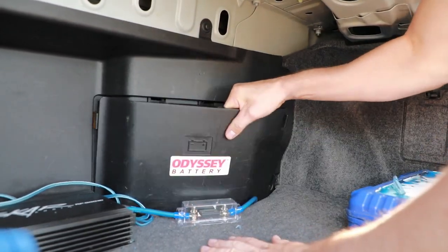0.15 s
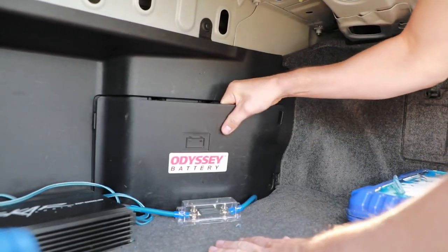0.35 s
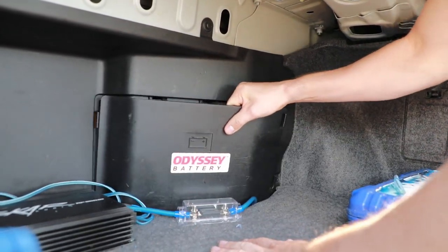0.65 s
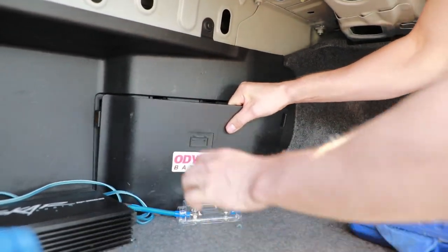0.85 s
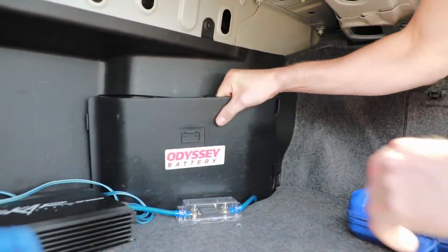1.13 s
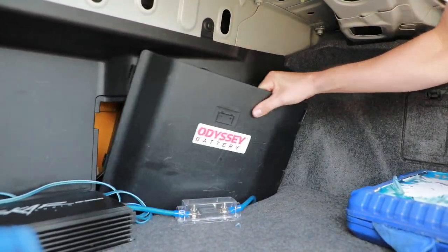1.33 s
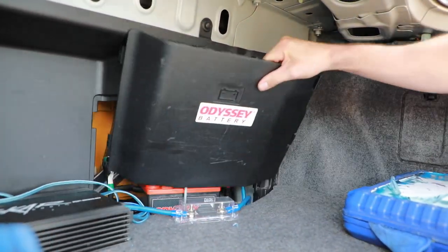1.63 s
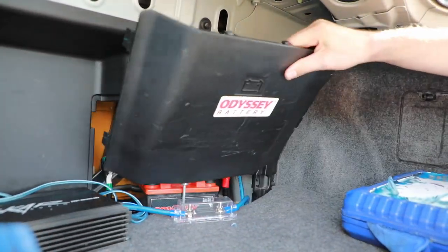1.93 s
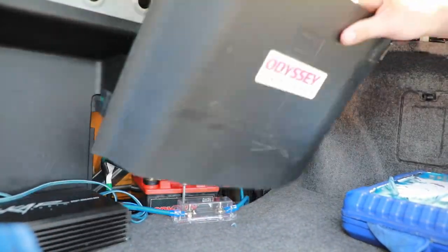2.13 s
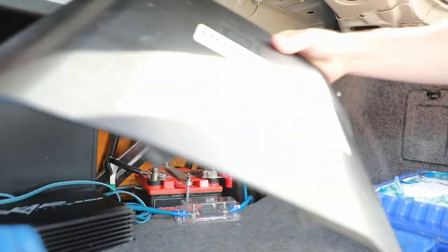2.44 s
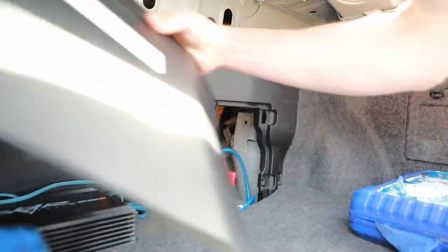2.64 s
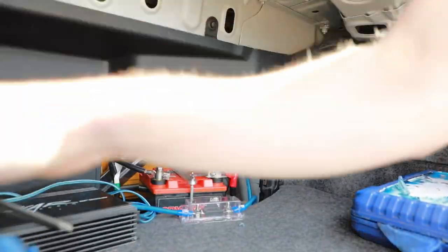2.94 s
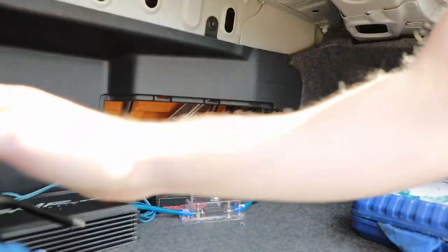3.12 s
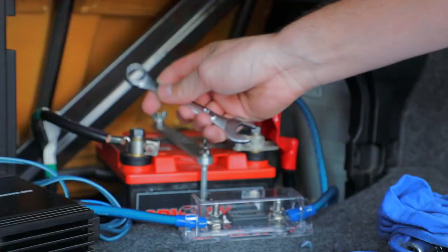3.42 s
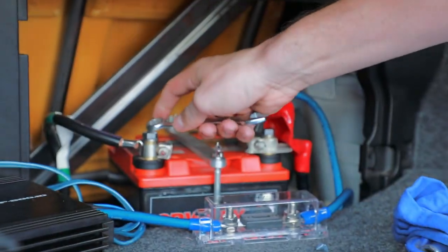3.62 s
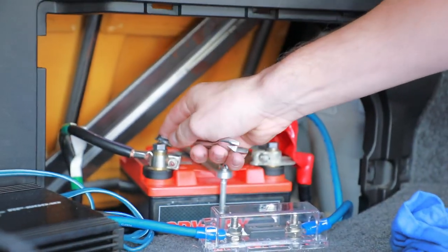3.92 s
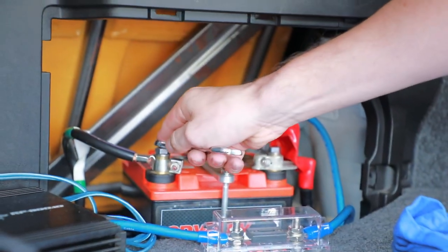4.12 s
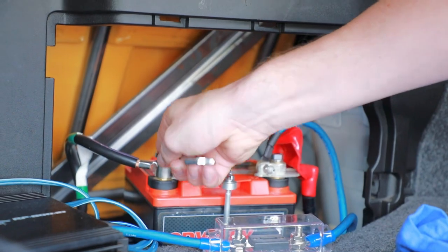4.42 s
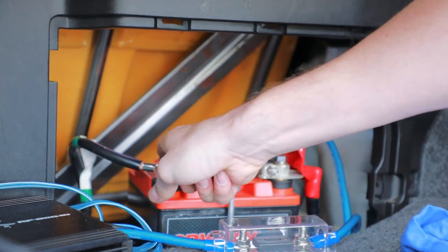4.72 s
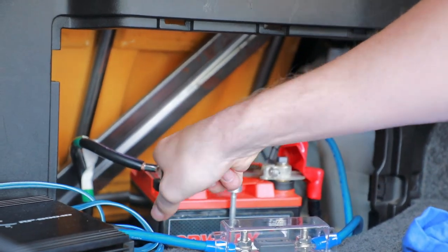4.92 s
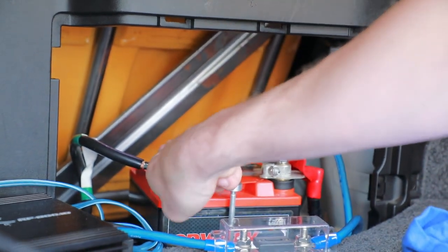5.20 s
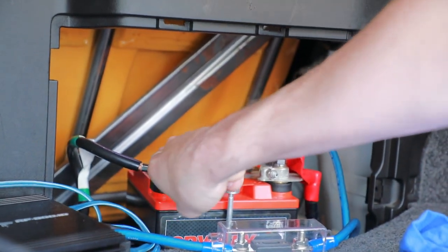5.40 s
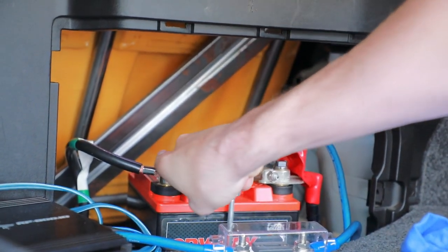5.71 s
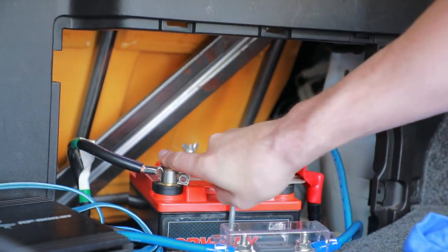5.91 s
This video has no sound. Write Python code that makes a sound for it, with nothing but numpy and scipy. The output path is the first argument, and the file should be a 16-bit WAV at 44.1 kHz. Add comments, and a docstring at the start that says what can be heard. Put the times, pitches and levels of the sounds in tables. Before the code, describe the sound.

A plastic cover creaks, snaps free and knocks in a car trunk, then a steel spanner clinks lightly on a battery terminal.

```python
"""Outdoor air drifts into a carpeted car trunk, where a plastic battery cover creaks under strain
and its tabs snap free. A thin high hiss comes and goes as the loose cover knocks and is slid aside.
A steel spanner is picked up and clinks onto the battery terminal, and fingers fiddle with the nut.
Towards the end a faint engine hum swells and eases."""
import sys
import numpy as np
from scipy import signal
from scipy.fft import rfft, irfft, next_fast_len
from scipy.io import wavfile
from scipy.ndimage import map_coordinates

SR = 44100
rng = np.random.default_rng(int(sys.argv[2]) if len(sys.argv) > 2 else 0)


def wav_out(sig):
    """Save sig, one row per channel (or a flat mono array), as 16-bit PCM at SR to the path in sys.argv[1]."""
    wavfile.write(sys.argv[1], SR, np.round(np.clip(np.atleast_2d(sig).T, -1, 1) * 32767).astype(np.int16))


N = 267025
TIME = np.arange(N) / SR
RING = np.arange(SR // 2) / SR  # time since a blow [s]


def amp(db):
    """Decibels to amplitude ratio."""
    return 10 ** (np.asarray(db) / 20)

def unit(x):
    """Normalise to rms 1."""
    return x / np.sqrt(np.mean(x ** 2) + 1e-20)

def unit_blow(x):
    """Normalise a blow to the energy of 10 ms at rms 1."""
    return x / np.sqrt(np.sum(x ** 2) / (SR / 100) + 1e-20)

def along(points, hz):
    """Interpolate (frequency [Hz], value) points on a log axis."""
    freqs, values = np.transpose(points)
    return np.interp(np.log(hz + 1), np.log(freqs), values)

def wobble(rate):
    """Smooth random modulation, rate knots a second."""
    return map_coordinates(rng.standard_normal(int(N * rate / SR) + 4), [TIME * rate])

def held(start, end, rise_db_per_s, fall_db_per_s):
    """Exponential attack and release, with gain 1 from start to end."""
    return amp(-rise_db_per_s * np.maximum(start - TIME, 0) - fall_db_per_s * np.maximum(TIME - end, 0))

def swells(strokes):
    """Skewed Gaussian envelopes: each stroke dies more slowly than it rises."""
    return sum(amp(db) * np.exp(-.5 * ((TIME - s) / (rise * np.where(TIME < s, 1, 1.73))) ** 2)
               for s, rise, db in strokes)

def chance_moments(start, end, count):
    """One random time in each of count equal intervals."""
    return start + (end - start) * (np.arange(count) + rng.random(count)) / count

def add(track, s, sound):
    """Superpose a sound on the track at time s."""
    part = track[max(round(s * SR), 0):][:len(sound)]
    part += sound[:len(part)]

def colour(x, spectrum):
    """Minimum-phase filter from (frequency [Hz], level [dB]) points."""
    size = 2 * next_fast_len(len(x) // 2 + 4096)
    gain = amp(along(spectrum, np.fft.rfftfreq(size, 1 / SR)))
    cepstrum = irfft(np.log(np.maximum(gain, 1e-6)))
    cepstrum[1:size // 2] *= 2
    cepstrum[size // 2 + 1:] = 0
    return irfft(rfft(x, size) * np.exp(rfft(cepstrum)))[:len(x)]

def band(x, edges, kind, order=3):
    """Causal low-, high- or band-pass."""
    return signal.sosfilt(signal.butter(order, edges, kind, fs=SR, output="sos"), x)

def ring(modes, scatter_db, damping):
    """Free vibration: a sum of damped modes, struck at new strengths each time."""
    hz, db, t60 = np.transpose(modes)[:, :, None]
    gain = amp(db + scatter_db * rng.standard_normal(hz.shape) - 60 * damping * RING / t60)
    return unit_blow(np.sum(gain * np.sin(2 * np.pi * (hz * RING + rng.random(hz.shape))), axis=0))

def friction(spectrum, rate, spread_db, slip_t60):
    """Stick-slip friction: rate uneven slips a second, each a noise burst coloured by the body."""
    slips = (rng.random(N) < rate / SR) * amp(spread_db * np.clip(rng.standard_normal(N), -2, 2))
    power = signal.lfilter([1], [1, -amp(-120 / (slip_t60 * SR))], slips ** 2)
    return unit(colour(np.sqrt(power) * rng.standard_normal(N), spectrum))


# Spectrum of the air (frequency [Hz], relative level [dB])
AIR_SPECTRUM = [(25, -20.5), (90, -20.5), (130, -10.5), (180, -7.5), (280, -8), (390, -4), (520, -11),
                (850, -2.5), (1350, -6), (2200, -12.5), (3500, -27), (5400, -35), (7200, -31),
                (10000, -32.5), (16000, -43.5)]
def outdoor_air():
    """Broadband ambient noise that wavers and slowly calms."""
    level_db = -50 - 0.62 * TIME + 0.82 * wobble(5.3)
    return amp(level_db) * unit(colour(rng.standard_normal(N), AIR_SPECTRUM))

# Decay in the trunk (frequency [Hz], t60 before scaling by length [s])
TRUNK_DECAY = [(100, 0.39), (260, .19), (700, 0.1), (1840, 0.1), (4850, 0.075), (12800, 0.049)]
def clatter(length, snap, snap_t60):
    """Frequency-dependent damping: a snap, then dense resonances whose treble dies first."""
    hz, t, noise = signal.stft(rng.standard_normal(len(RING)), SR, nperseg=256)
    uneven_db = 4 * rng.standard_normal((len(hz), 1)) * (hz[:, None] > 800)
    decay_db = -60 * t / (max(length, .2) * along(TRUNK_DECAY, hz)[:, None])
    tail = signal.istft(noise * amp(uneven_db + decay_db), SR, nperseg=256)[1][:len(RING)]
    return tail * (1 + snap * amp(-60 * RING / snap_t60))

USUAL_CRACK_DB = -12
# Spectrum of the plastic (frequency [Hz], relative level [dB])
PLASTIC_SPECTRUM = [(29, -60), (50, -39), (128, -10), (258, 2.5), (532, 0), (615, -2.5), (765, -5),
                    (1070, -3.5), (1180, -3.5), (2880, -12), (5530, -23.5), (7570, -17.5), (8340, -23),
                    (11400, -21), (16000, -41)]
# Modes of the cover (frequency [Hz], relative level [dB], t60 at damping 1 [s])
COVER_MODES = [(126, -17.5, 0.29), (150.5, -20, .19), (203, -14, 0.13), (250, -14, 0.18), (294, -14.5, .15),
               (490.4, 1.5, 0.09), (607, -2, 0.073), (700, -15, .08), (1025, -14.5, .08),
               (1350, -12.5, 0.15), (1390, -5.5, 0.081), (1550, -6, 0.066), (1780, -2, .045),
               (1961, -0.5, 0.054), (2140, -10.5, 0.043), (2450, -9.5, 0.05), (2720, -11, 0.05),
               (2880, -15, 0.074), (3470, -14.5, 0.034)]
def contact(db, crack_db, seated):
    """Impact excitation: hard contacts crack, soft ones thud; seated, the cover thuds more."""
    harder_db = crack_db - USUAL_CRACK_DB
    hardness = amp(0.32 * harder_db)
    usual_thud_db, usual_length = (-5.5, .8) if seated else (-10.5, 0.92)
    thud_db = usual_thud_db - 0.33 * harder_db
    length = usual_length * np.exp(-0.0041 * db + 0.08 * min(harder_db, 0))  # soft ones die sooner
    onset = 1 - np.exp(-RING * hardness / .0006)
    blow = colour(clatter(length, snap=1.15 * hardness, snap_t60=0.0054) * onset, PLASTIC_SPECTRUM)
    thud = amp(thud_db) * unit_blow(band(blow, 470, "low"))
    clack = unit_blow(band(blow, [700, 3300], "band"))
    top_hz = min(12500 * np.sqrt(hardness), .45 * SR)
    crack = amp(crack_db) * unit_blow(band(band(blow, 4700, "high"), top_hz, "low"))
    modes = ring(COVER_MODES, scatter_db=1, damping=1.5 / length) * onset
    hollow = amp(thud_db - 2) * band(modes, 110, "high", order=2)
    return amp(db - 7.5) * (thud + clack + crack + hollow)

GRIP_START_S, GRIP_END_S = .07, 1.9  # the hand holds the cover under strain
FREE_S = 1.14  # the first tab lets go: the cover no longer drives the trunk wall
# Contacts of the cover (time [s], relative level [dB], crack above the clack [dB])
COVER_CONTACTS = [(0.012, -35, -54), (0.0666, -19, -8.5), (0.166, -33.5, -21), (0.290, -32, -21),
                  (0.4266, -21.5, -28), (0.4414, -20.5, -25.5), (0.634, -36.5, -18), (0.732, -36.5, -13),
                  (0.780, -35.5, -23), (0.940, -13.5, -10.5), (1.09, -28.5, -19), (1.117, -20.5, -15.5),
                  (1.1471, -8, -5.5), (1.199, -26, -21), (1.216, -26.5, -16), (1.232, -18, -25),
                  (1.2431, -8, -20), (1.2525, -7, -17), (1.2612, -8.5, -9), (1.287, -5.5, -5),
                  (1.296, -15, -0.5), (1.309, -12, -10.5), (1.338, -22, -18), (1.406, -21, -19),
                  (1.412, -28, -11), (1.6218, -11, -7), (1.644, -17.5, -14), (1.665, -21, -10),
                  (1.691, -17, -6.5), (1.712, -20.5, -21), (1.806, -36.5, -36), (1.8255, -23.5, -22.5),
                  (1.871, -36.5, -0.5), (2.2393, -8, -9), (2.744, -42, 0.5), (2.873, -19.5, -13),
                  (2.948, -25, -11), (2.965, -32, -4)]
def cover_tabs():
    """Release of elastic energy: tabs catch, slip and snap free, with faint rattles in between."""
    out = np.zeros(N)
    for s, db, crack_db in COVER_CONTACTS:
        add(out, s, contact(db, crack_db, seated=s < FREE_S))
        if crack_db > USUAL_CRACK_DB and s < GRIP_END_S:  # a tab slips just before it snaps
            add(out, s - 0.0039, contact(db - 14.5, USUAL_CRACK_DB, seated=s < FREE_S))
    for s in chance_moments(GRIP_START_S, FREE_S, count=12):
        db, crack_db = rng.normal([-39.5, -15.5], 2)
        add(out, s, contact(db, crack_db, seated=True))
    return out

def cover_creak():
    """Stick-slip under load: strain builds towards each contact and relaxes after it."""
    load_and_relax = 258.5, 169.5  # [dB/s]
    strain = amp(-55 + 1.5 * wobble(13.33)) * held(GRIP_START_S, GRIP_END_S, *load_and_relax)
    for s, db, _ in COVER_CONTACTS:
        if GRIP_START_S < s < GRIP_END_S:
            strain = np.maximum(strain, amp(-31 + .45 * db) * held(s, s, *load_and_relax))
    slips = friction(PLASTIC_SPECTRUM, rate=150, spread_db=3.5, slip_t60=.07)
    return band(strain * slips, 3600, "low", order=1)

# Strokes along the lining (peak time [s], rise [s], level [dB])
COVER_STROKES = [(0.155, 0.0094, -52), (0.418, .008, -47.5), (0.525, .008, -52), (0.615, .012, -49),
                 (0.742, .006, -53.5), (1.104, 0.004, -44), (1.605, 0.031, -43.5), (2.745, 0.018, -52),
                 (2.807, 0.0064, -32.5), (2.866, 0.02, -27.5), (2.961, 0.0062, -36), (3.03, 0.06, -52)]
# Spectrum of the rubbed lining (frequency [Hz], relative level [dB])
LINING_SPECTRUM = [(60, -37), (160, -15), (400, -5.5), (1000, -1.5), (2000, 0), (3100, -5.5), (4500, -17.5),
                   (6000, -15.5), (7200, -7.5), (8500, -10), (11000, -8), (13000, -13.5), (14200, -23),
                   (16000, -24)]
def cover_scrape():
    """Sliding friction: dense slips of plastic on carpet merge into a scrape."""
    return swells(COVER_STROKES) * friction(LINING_SPECTRUM, rate=1700, spread_db=10, slip_t60=0.046)

# Spectrum of the hiss (frequency [Hz], relative level [dB])
HISS_SPECTRUM = [(2000, -19), (3200, -4.5), (5500, -11.5), (7200, -4.5), (8300, -6.5), (11000, -2),
                 (12600, -11), (14000, -19), (16000, -29.5)]
# Spells of hiss (start [s], end [s], starting level [dB])
HISS_TIMES = [(1.743, 3.039, -58), (3.162, 3.45, -60.5), (3.822, 4.25, -64)]
def hiss():
    """Comb filtering: a reflection off the moving cover and arm draws shifting bands in a hiss."""
    direct = colour(rng.standard_normal(N), HISS_SPECTRUM)
    lag_s = 0.00045 * (1 + 0.081 * wobble(2.7))
    echo = map_coordinates(direct, [(TIME - lag_s) * SR])
    spells = sum(amp(db - 4 * (TIME - start)) * held(start, end, rise_db_per_s=110, fall_db_per_s=500)
                 for start, end, db in HISS_TIMES)
    return spells * amp(wobble(17)) * unit(direct + 0.29 * echo)

# Blows on the freed cover (time [s], level [dB], treble limit [Hz], damping [ratio])
COVER_KNOCKS = [(2.131, -35.5, 282, 8.2), (2.2389, -13.5, 4990, 0.62), (3.445, -61, 149.9, 2.9)]
def cover_knocks():
    """Modal response of a free panel: a soft bump excites only its low modes."""
    out = np.zeros(N)
    for s, db, top_hz, damping in COVER_KNOCKS:
        modes = ring(COVER_MODES, scatter_db=1, damping=damping)
        add(out, s, amp(db) * unit_blow(band(modes, [115, top_hz], "band", order=2)))
    return out

# Modes of the handle (frequency [Hz], relative level [dB], t60 [s])
HANDLE_MODES = [(1310, 1, 0.027), (1513, 4.5, 0.028), (1770, -7, 0.04), (2130, -10, 0.044),
                (3230, -5, 0.06)]
# Tap on the handle (time [s], level [dB])
PICKUP_TAPS = [(3.254, -34.5)]
def spanner_pickup():
    """Damped free vibration: the handle rings briefly as it is picked up."""
    out = np.zeros(N)
    onset = 1 - np.exp(-RING / .0008)
    for s, db in PICKUP_TAPS:
        add(out, s, amp(db) * ring(HANDLE_MODES, scatter_db=1, damping=1) * onset)
    return out

# Modes of the spanner and battery case (frequency [Hz], relative level [dB], t60 at damping 1 [s])
STEEL_MODES = [(2320, -23, 0.085), (2824, -17, 0.056), (4420, -27.5, 0.072), (6150, -14, 0.064),
               (6600, -19, 0.03), (7180, -10, 0.041), (9420, 1, 0.025), (9910, -0.5, 0.042),
               (9640, 6, 0.028), (10920, -18.5, 0.043), (14000, -13.5, .03), (14790, -21.5, .05)]
CASE_MODES = [(274, -1, 0.19), (399, -7, 0.24), (605, 2, 0.062), (857, -2.5, 0.1), (1102, -3, 0.042)]
# Spectrum of a tick on the nut (frequency [Hz], relative level [dB])
NUT_SPECTRUM = [(150, -32), (500, -9), (1000, -7), (2700, -3), (3700, -17), (5200, -6.5), (7200, 2.5),
                (8300, -5.5), (9800, 3), (12000, -6.5), (15000, -15)]
# Spanner contacts (time [s], clack level [dB], ring level [dB], damping by the grip [ratio])
SPANNER_CLINKS = [(3.5924, -44.5, -21.5, 0.68), (3.623, -43.5, -38, 1.2), (3.7519, -50, -35.5, .95),
                  (4.247, -42, -66, 1.3), (4.351, -40, -61, 1.5), (4.412, -33.5, -55, 1.3),
                  (4.4924, -39, -22.5, 1.37)]
def spanner_clinks():
    """Impact excites both bodies: the steel rings, the terminal clacks and the case under it knocks."""
    out = np.zeros(N)
    onset = 1 - np.exp(-RING / 0.0011)
    for s, clack_db, ring_db, grip in SPANNER_CLINKS:
        steel = amp(ring_db) * ring(STEEL_MODES, scatter_db=1.5, damping=grip)
        case = amp(clack_db - 2) * band(ring(CASE_MODES, scatter_db=2, damping=1), 200, "high")
        terminal = band(clatter(0.62, snap=0.28, snap_t60=.006), [1800, 2550], "band", order=2)
        clack = amp(clack_db) * unit_blow(terminal)
        tick_gain = np.hypot(amp(clack_db - 10.5), amp(ring_db - 8.5))
        tick = tick_gain * unit_blow(colour(clatter(0.67, snap=0.33, snap_t60=0.0057), NUT_SPECTRUM))
        add(out, s, (steel + clack + tick) * onset + case)
    return out

# Path of a narrow peak in the hiss (time [s], frequency [Hz])
WHISTLE_PATH = [(3.74, 11600), (3.859, 12500), (4.1, 11200), (4.249, 9960), (4.31, 9000)]
def whistle():
    """Narrow-band noise: a faint peak rises briefly, then sinks in pitch."""
    times, hz = np.transpose(WHISTLE_PATH)
    carrier = np.sin(2 * np.pi * np.cumsum(np.interp(TIME, times, hz)) / SR)
    narrow = unit(carrier * band(rng.standard_normal(N), 330, "low", order=2))
    return amp(-71.5) * held(times[0], times[-1], rise_db_per_s=110, fall_db_per_s=500) * narrow

# Slides of the hand on the spanner (peak time [s], rise [s], level [dB])
HAND_SLIDES = [(3.93, .022, -49.5), (4.05, .004, -53), (4.108, 0.01, -51), (5.475, 0.011, -59)]
# Fingers on the nut (time [s], relative level [dB])
NUT_TICKS = [(5.493, -46), (5.5285, -37.5), (5.691, -47.5), (5.7309, -53)]
def fingers():
    """Friction and light impacts: skin slides on the tool and the nut gives small dry ticks."""
    skin_spectrum = [(200, -8), (900, 4), (3000, -1), (6000, -17), (15000, -17)]
    out = swells(HAND_SLIDES) * friction(skin_spectrum, rate=900, spread_db=5, slip_t60=0.024)
    faint_ticks = [(s, rng.normal(-52.5, 4)) for s in chance_moments(3.7, 5.25, count=6)]
    for s, db in NUT_TICKS + faint_ticks:
        tick = colour(clatter(0.7, snap=1.3, snap_t60=0.0025), NUT_SPECTRUM)
        add(out, s, amp(db - 11.5) * unit_blow(tick))
    return out

# Engine harmonics (multiple of the fundamental, relative level [dB])
ENGINE_HARMONICS = [(2, -3.5), (3, -20), (4, -12.5), (6, -16)]
def engine():
    """Harmonic series: a far engine swells and eases at a steady pitch as its overtones waver."""
    fundamental_hz, peak_s = 91.5, 5.55
    phase = 2 * np.pi * np.cumsum(fundamental_hz * (1 + 0.00317 * wobble(4.9))) / SR
    hum = sum(amp(db + (0.5 if k == 2 else 3.5) * wobble(7)) * np.sin(k * phase)
              for k, db in ENGINE_HARMONICS)
    return amp(-50.5) * held(peak_s, peak_s, rise_db_per_s=14.5, fall_db_per_s=3.5) * unit(hum)

def scene():
    """Superposition of all sources at the mouth of the trunk."""
    return (outdoor_air() + cover_tabs() + cover_creak() + cover_scrape() + hiss() + cover_knocks()
            + spanner_pickup() + spanner_clinks() + whistle() + fingers() + engine())[None]

def record(dry):
    """Soft saturation rounds the highest peaks; a steep low-pass limits the band."""
    rounded = dry / (1 + np.abs(dry) ** 6) ** (1 / 6)
    hz = np.fft.rfftfreq(N, 1 / SR)
    return irfft(rfft(rounded) / (1 + (hz / 15900) ** 200), N)


dry = scene()
out = record(dry)
wav_out(out)
```